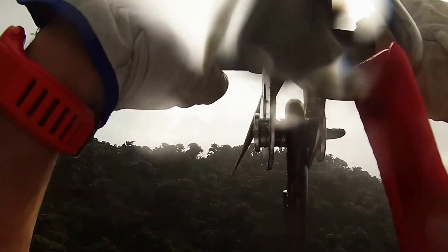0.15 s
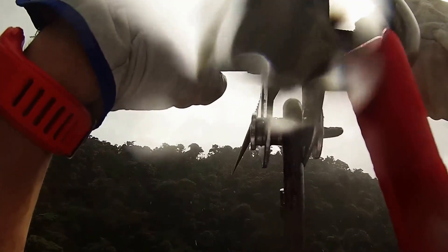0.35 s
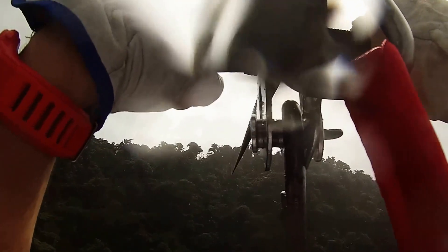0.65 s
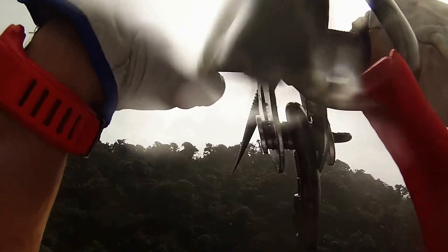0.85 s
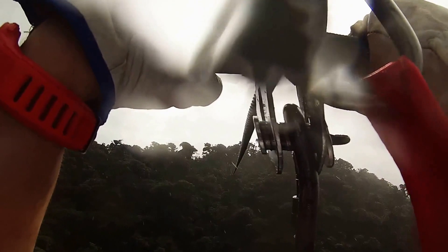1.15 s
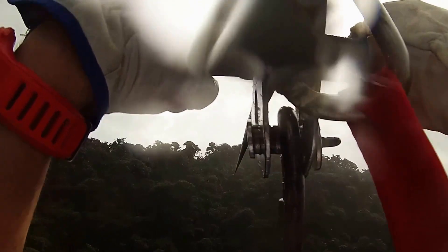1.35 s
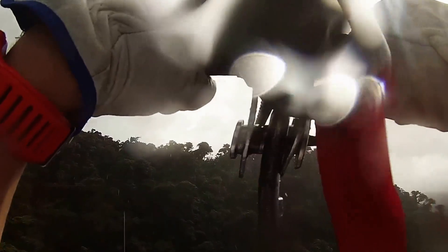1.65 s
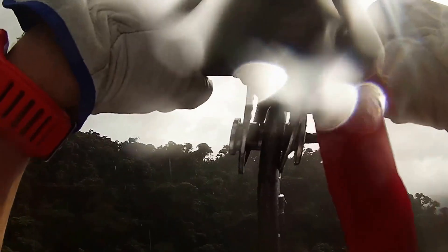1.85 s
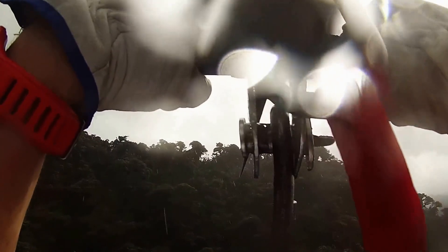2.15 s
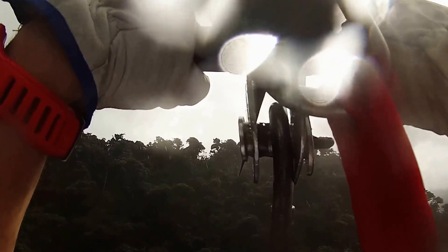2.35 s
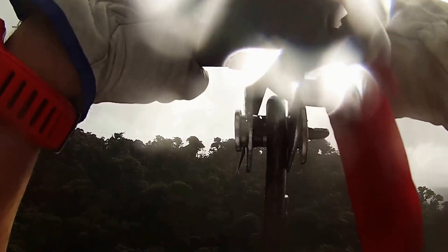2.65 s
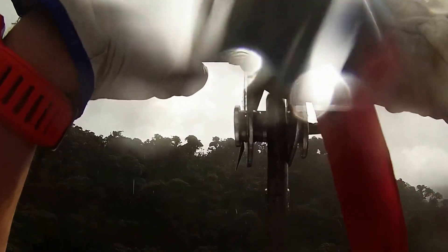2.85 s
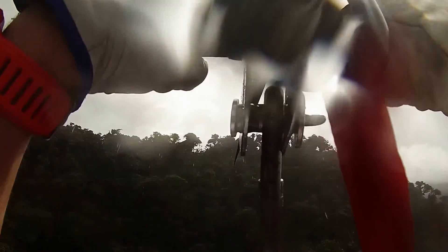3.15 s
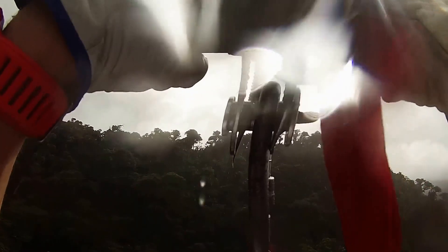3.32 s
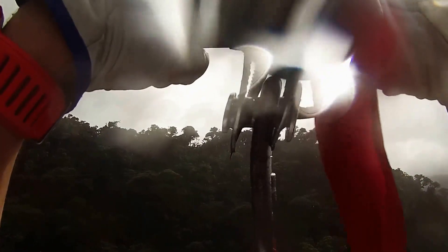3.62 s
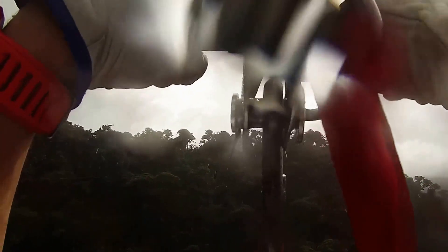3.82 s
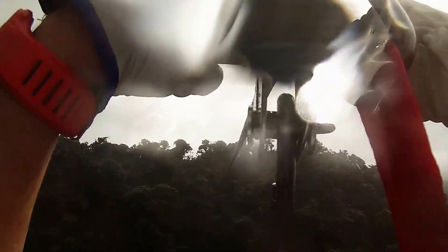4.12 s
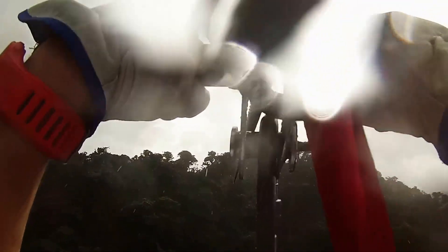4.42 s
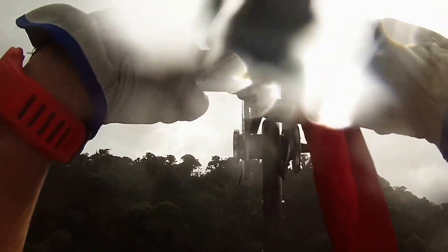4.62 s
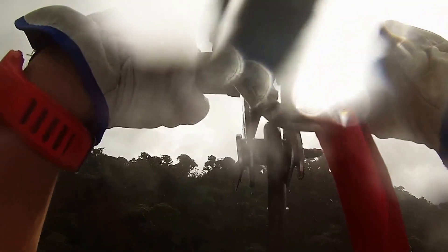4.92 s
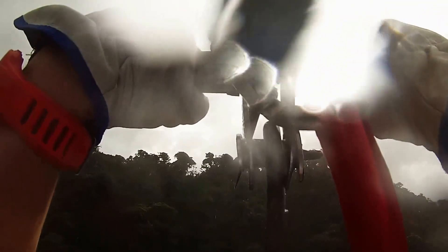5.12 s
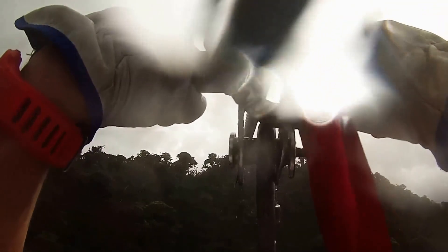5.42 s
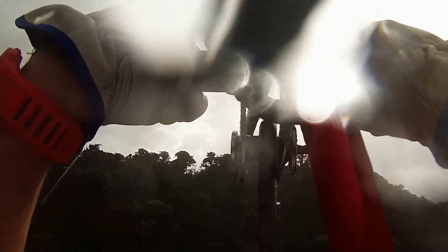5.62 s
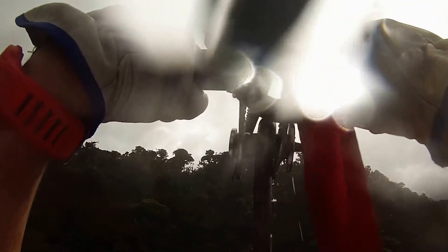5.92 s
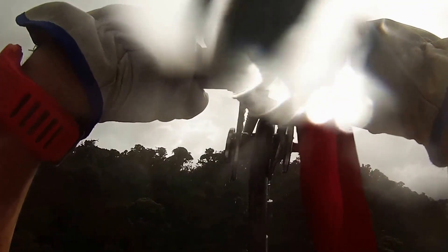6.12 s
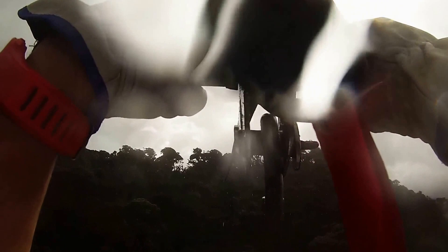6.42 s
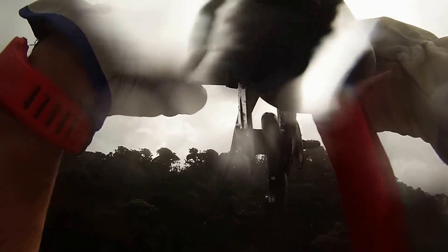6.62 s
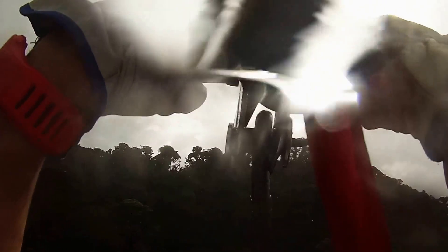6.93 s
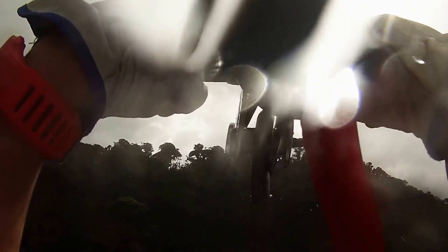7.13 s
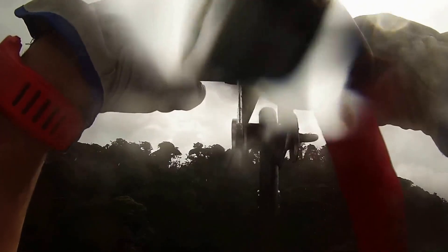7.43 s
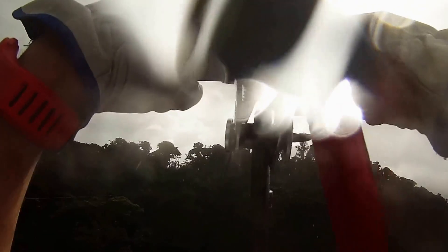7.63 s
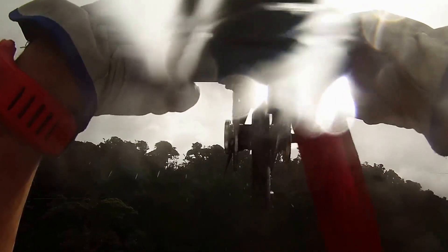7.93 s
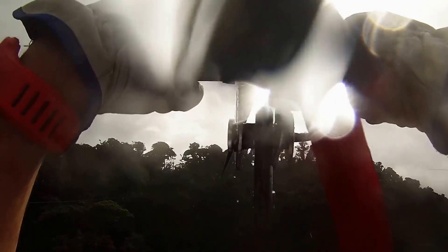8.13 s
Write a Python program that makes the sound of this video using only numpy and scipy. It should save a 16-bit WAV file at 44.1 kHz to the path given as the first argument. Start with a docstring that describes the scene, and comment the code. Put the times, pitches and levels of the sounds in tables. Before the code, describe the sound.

A pulley trolley runs down a steel cable with a continuous, gritty, high metallic whine, its buzz rising slightly in pitch before levelling off. Softer wind rumble and a low hum lie beneath it. A few raindrops tap and click by the microphone, which rides along outdoors. About three seconds in, one hard drop briefly ducks the whole sound.

```python
"""A gritty, ringing whine: a pulley trolley runs down a steel cable in light rain.
The wheels hiss, and the cable's twist adds a buzz that rises with speed; both make the trolley ring.
Wind rumbles on a camera case riding along and shakes a low hum out of the rig.
Raindrops tap the case or click by the microphone inside it. One hard drop makes the limiter
(an automatic volume control) turn everything down for a moment."""
import sys
import numpy as np
from scipy import signal
from scipy.fft import rfft, irfft, next_fast_len
from scipy.io import wavfile
from scipy.ndimage import uniform_filter1d

SR = 44100
rng = np.random.default_rng(int(sys.argv[2]) if len(sys.argv) > 2 else 0)


def digitize_waveform(pressure):
    """Quantize a signal to 16-bit integers and store it at the path in sys.argv[1].

    Rows of a 2-D input are taken as channels; values are limited to [-1, 1].
    """
    field = np.atleast_2d(pressure).T
    bounded = np.clip(field, -1, 1)
    quanta = np.round(bounded * 32767).astype(np.int16)
    wavfile.write(sys.argv[1], SR, quanta)


N = 364707
STEP = 100  # samples between the points of a slow curve


def gain_of(db):
    """Turns decibels into a number to multiply a sound by."""
    return 10 ** (np.asarray(db) / 20)


def evened(x):
    """Scales a signal to an average strength (rms) of 1."""
    return x / np.sqrt(np.mean(x ** 2) + 1e-20)


def level_at(table, hz):
    """Looks up a level between a table's pitches, on a musical (log) scale."""
    pitch_hz, level_db = np.transpose(table)
    return np.interp(np.log(hz + 1), np.log(pitch_hz + 1), level_db)


def wander(rate_hz, count=1, margin=200):
    """Smooth random curves of strength 1, one point every STEP samples."""
    raw = rng.standard_normal((count, N // STEP + 2 + 2 * margin))
    slow = signal.sosfiltfilt(signal.butter(2, rate_hz, fs=SR / STEP, output="sos"), raw)
    return evened(slow[:, margin:-margin])


def filled(curve):
    """Fills in a slow curve so that every sample has a value."""
    return np.interp(np.arange(N) / STEP, np.arange(len(curve)), curve)


def add(mix, start_s, sound):
    """Adds a sound to the mix at its start time."""
    part = mix[round(start_s * SR):][:len(sound)]
    part += sound[:len(part)]


# A slow tilt of the tone. Columns: time_s, tilt (no unit)
TONE_TILT = [(0, -4.5), (.6, -2), (1.05, -4), (1.3, -3), (1.55, -2.5), (1.8, 0.5), (2.5, -1), (3.5, 1.6),
             (4.25, -2.6), (4.75, 2.5), (5.25, 0.1), (5.7, 1.5), (6.4, 1), (6.75, -0.5), (7.05, 2),
             (7.7, 1.5), (8.27, 0)]
def tone_tilt(t):
    """A slow tilt of the tone, which shifts the level among the trolley's ringing notes."""
    return np.interp(t, *np.transpose(TONE_TILT))


TOP_RATE_HZ = 135.95
def twist_rate(t, climb_hz_per_s=2.7, level_off_s=4.3, bend_s=.8):
    """Cable twists passed each second: the trolley gathers speed, then levels off."""
    return TOP_RATE_HZ - climb_hz_per_s * bend_s * np.log1p(np.exp((level_off_s - t) / bend_s))


# The tone of the buzz from the cable's twist. Columns: pitch_hz, relative_db
BUZZ_TONE = [(1200, -17.5), (1900, -12.5), (2250, -10.5), (2500, -1), (3000, -4.5), (3500, -9), (4200, -9),
             (5300, -8), (6500, -14.5)]
def wheel_contact(buzz_db=-15, db_per_tilt=.48, waver_db=3, waver_hz=20, blur_rad=.94, grit_db=.62):
    """Wheels on steel: a flickering hiss, plus a buzz of wavering tones at multiples of the twist rate."""
    t = np.arange(N // STEP + 2) * STEP / SR
    rate_hz = twist_rate(t) + .3 * wander(1.992)[0]  # the speed wobbles slightly
    twists = np.cumsum(filled(rate_hz)) / SR
    multiples = np.arange(10, 48)
    level_db = buzz_db + db_per_tilt * tone_tilt(t) + level_at(BUZZ_TONE, np.outer(multiples, rate_hz))
    sizes = gain_of(level_db + waver_db * wander(waver_hz, len(multiples)))
    phases = 2 * np.pi * rng.random((len(multiples), 1))
    phases = phases + blur_rad * wander(waver_hz, len(multiples))
    buzz = sum(filled(size) * np.cos(2 * np.pi * multiple * twists + filled(phase))
               for multiple, size, phase in zip(multiples, sizes, phases))
    flicker = filled(gain_of(grit_db * wander(15.4)[0]))
    return flicker * rng.standard_normal(N) + buzz


# The hollow between gloves and case boosts a band that moves with the hands.
# Columns: time_s, pitch_hz, boost_db
HAND_HOLLOW = [(.5, 4820, 0.5), (1, 4670, -0.5), (1.4, 4950, 3.5), (1.65, 5200, 3), (2.6, 5060, 5),
               (3.7, 4960, 0.5), (4.3, 4800, 3), (5.3, 4900, 3.5), (6.7, 4840, 4), (7.5, 5000, 5)]
# A band in the top treble glides and swells. Columns: time_s, pitch_hz, boost_db
TREBLE_DRIFT = [(0, 9600, -2.5), (.75, 9650, 3.5), (1, 10100, -2.5), (1.4, 10200, 3), (1.75, 9500, -1),
                (2.15, 9800, 1), (2.45, 9800, 6), (3.6, 9900, -2.5), (4.35, 10100, 3), (4.7, 9900, 2.5),
                (5.1, 9800, 5.5), (6.7, 9800, 0), (7.65, 9800, 7.5), (7.95, 9440, -3), (8.27, 9600, 4)]
def moving_band(table, hz, t, width_share, extra_db=0):
    """How much a gliding band of pitches is boosted or cut, as a power multiplier."""
    time_s, pitch_hz, boost_db = np.transpose(table)
    distance = (hz[:, None] / np.interp(t, time_s, pitch_hz) - 1) / width_share
    peak_db = np.interp(t, time_s, boost_db) + extra_db
    return gain_of(2 * peak_db * np.exp(-(2 * distance) ** 2))


# The notes that trolley and case ring at. Columns: pitch_hz, width_hz, relative_db, db_per_tilt
TROLLEY_NOTES = [(980, 210, -29, -1), (1714, 322, -13.5, -1.5), (1930, 213, 1, -1), (2236, 157, -4.5, -1),
                 (2495, 310, -13.5, -1.5), (2877, 263, -5, -2.9), (2976, 170, -1, -0.9),
                 (3324, 230, -10, -0.6), (3383, 240, -7.5, -0.5), (3515, 93, -16, 4),
                 (3630, 205, -11.5, -1.9), (4154, 340, -14.5, -2.3), (4476, 437, -7.5, -1.5),
                 (4880, 190, -10.5, -1), (5100, 640, -12.5, -1.5), (5300, 70, -12, 1),
                 (5696, 250, -10, -0.1), (5843, 236, -9.5, 0.34), (6106, 400, -17, -1.5),
                 (6470, 200, -25.5, -3), (7060, 590, -18.5, -0.7), (7614, 460, -17.5, -0.4),
                 (8410, 1400, -21.5, -0.7), (8860, 200, -31, 4), (9380, 270, -18.5, -0.5),
                 (10070, 1070, -21, -1.5), (11700, 2200, -30, -0.5), (12400, 490, -31.5, -1),
                 (13050, 600, -31, -2), (14950, 430, -44, -2)]
# The strongest high ring rises and falls in level. Columns: time_s, change_db
RING_DRIFT = [(0, -4), (1.3, -3.5), (1.5, 2.5), (1.85, 0), (2.6, -0.5), (3.3, -0.5), (4, -2.5), (5.4, -4),
              (6.3, -1.5), (6.75, -3.5), (7.05, 0), (7.35, -4), (7.7, -1.5), (8.27, -4)]
def trolley_whine(whine_db=-15, steepness=2.09, ring_db_per_tilt=1.48, sing_db_per_hz=.15, swell_db=.5):
    """The wheels make trolley and case ring; the tone's tilt and the speed change which notes stand out."""
    slicing = dict(fs=SR, nperseg=2048, noverlap=1536)
    hz, t, contact = signal.stft(wheel_contact(), **slicing)  # the pitches in each short slice of time
    tilt = tone_tilt(t)
    pitch_hz, width_hz, note_db, db_per_tilt = np.transpose(TROLLEY_NOTES)[:, :, None]
    shapes = (1 + (2 * (hz - pitch_hz) / width_hz) ** 2) ** -steepness
    # the strongest high ring swells with the tilt
    ringing = (pitch_hz > 2700) & (pitch_hz < 3150)
    ring_db = np.interp(t, *np.transpose(RING_DRIFT)) + ring_db_per_tilt * tilt
    # two groups of notes grow with speed
    singing = ((pitch_hz > 3150) & (pitch_hz < 3700)) | ((pitch_hz > 5500) & (pitch_hz < 6000))
    sing_db = sing_db_per_hz * (twist_rate(t) - TOP_RATE_HZ)
    # each note also swells and fades a little on its own
    swells = evened(uniform_filter1d(rng.standard_normal((len(pitch_hz), len(t))), size=9))
    level_db = note_db + db_per_tilt * tilt + ringing * ring_db + singing * sing_db + swell_db * swells
    power = shapes.T @ gain_of(2 * level_db)
    power *= moving_band(HAND_HOLLOW, hz, t, width_share=.15, extra_db=-1.46 * tilt)
    power *= moving_band(TREBLE_DRIFT, hz, t, width_share=.08)
    # the whine's overall level is held steady: what some notes gain, the others lose
    power /= uniform_filter1d(power.sum(0), size=25)
    _, whine = signal.istft(contact * np.sqrt(power), **slicing)
    return gain_of(whine_db) * evened(whine[:N])


# The wind's rise and fall. Columns: time_s, level_db
GUST_LEVELS = [(0, -39), (.45, -36.5), (.9, -38.5), (1.6, -44.5), (2.3, -45), (3.3, -46), (3.8, -43),
               (4.6, -40), (5.1, -42), (5.7, -39.5), (6.3, -44), (6.75, -39), (7.3, -44.5), (7.85, -53),
               (8.27, -41.5)]
def gusts():
    """The wind's level in decibels at every sample."""
    return np.interp(np.arange(N) / SR, *np.transpose(GUST_LEVELS))


# The tone of wind on the case. Columns: pitch_hz, relative_db
WIND_TONE = [(15, -8), (24, -19), (40, -1.5), (70, -3), (110, -6.5), (200, -9.5), (320, -10.5), (450, -19),
             (620, -21), (800, -19), (1040, -23), (1760, -90)]
def wind_rumble(flutter_db=.4):
    """Air buffets the case: deep noise that follows the gusts and flutters a little."""
    level_db = gusts() - flutter_db * filled(wander(rate_hz=8)[0])
    size = next_fast_len(N)
    tone = gain_of(level_at(WIND_TONE, np.fft.rfftfreq(size, 1 / SR)))
    rumble = irfft(rfft(rng.standard_normal(size)) * tone, size)[:N]
    return gain_of(level_db) * evened(rumble)


# The rig's low notes in an average wind. Columns: pitch_hz, width_hz, level_db
RIG_NOTES = [(50.7, 16.3, -43.5), (165.7, 12, -53), (249.7, 47, -56.5), (317, 21, -60.5)]
def rig_hum(gust_share=.5, average_wind_db=-44):
    """Wind shakes the rig into a low hum that partly follows the gusts."""
    shake = rng.standard_normal(N)
    hum = np.zeros(N)
    for pitch_hz, width_hz, level_db in RIG_NOTES:
        peak = signal.iirpeak(pitch_hz, pitch_hz / width_hz, SR)
        note = signal.lfilter(*peak, signal.lfilter(*peak, shake))  # twice, for a purer note
        hum += gain_of(level_db) * evened(note)
    return gain_of(gust_share * (gusts() - average_wind_db)) * hum


# Rain landing on the case. Columns: start_s, peak_db, pitch_hz
CASE_TAPS = [(0.245, -32, 1100), (1.34, -36, 1080), (2.527, -29, 890), (3.28, -29, 1210),
             (5.589, -21.5, 935)]
def dull_taps(tap_s=.007):
    """Each drop knocks the case into a few soft vibrations."""
    taps, t = np.zeros(N), np.arange(1000) / SR
    bump = np.sin(np.pi * np.minimum(t / tap_s, 1)) ** 2
    for start_s, peak_db, pitch_hz in CASE_TAPS:
        add(taps, start_s, gain_of(peak_db) * bump * np.sin(2 * np.pi * pitch_hz * t))
    return taps


# Rain landing by the microphone. Columns: start_s, peak_db (before the limiter)
CLOSE_DROPS = [(1.785, -14), (2.0494, -5), (2.394, -12), (3.0016, 4.2)]
# The notes in one drop's click. Columns: pitch_hz, fade_s (time to fall 60 dB), relative_db
CLICK_NOTES = [(1150, .012, -18), (1750, .012, -6), (3100, .012, -2), (4400, .007, -7), (7300, .009, -8),
               (9500, .004, -18)]
def sharp_drops(rise_s=.0005):
    """Each close drop rings briefly at widely spread pitches, heard as a click."""
    drops, t = np.zeros(N), np.arange(1000) / SR
    click = sum(gain_of(level_db - 60 * t / fade_s) * np.sin(2 * np.pi * pitch_hz * t)
                for pitch_hz, fade_s, level_db in CLICK_NOTES)
    click *= np.sin(np.pi / 2 * np.minimum(t / rise_s, 1)) ** 2
    for start_s, peak_db in CLOSE_DROPS:
        add(drops, start_s, gain_of(peak_db) * click / abs(click).max())
    return drops


def scene():
    """One microphone hears it all, so left and right are the same."""
    mix = trolley_whine() + wind_rumble() + rig_hum() + dull_taps() + sharp_drops()
    return np.tile(mix, (2, 1))


def record(dry, ceiling_db=-1, recovery_db_per_s=6, top_hz=15250):
    """A limiter turns loud peaks down fast and recovers slowly; then the highest treble is cut."""
    peak_db = 20 * np.log10(abs(dry).max(0) + 1e-9)
    recovery_db = np.arange(N) * recovery_db_per_s / SR
    held_db = np.maximum.accumulate(peak_db + recovery_db) - recovery_db
    cut_db = np.maximum(held_db - ceiling_db, 0)
    ahead = 220  # samples: the limiter acts 5 ms early
    cut_db = uniform_filter1d(np.append(cut_db[ahead:], np.zeros(ahead)), size=60)
    treble_cut = signal.firwin(511, top_hz, window=("kaiser", 9), fs=SR)
    return signal.oaconvolve(dry / gain_of(cut_db), treble_cut[None], "same")


dry = scene()
out = record(dry)
digitize_waveform(out)
```